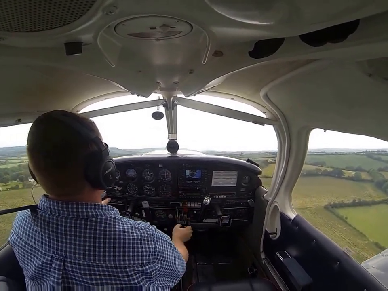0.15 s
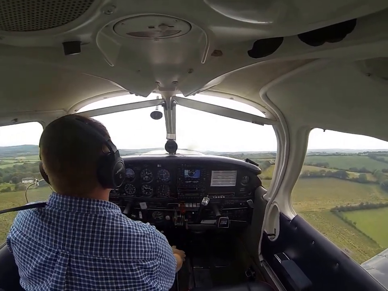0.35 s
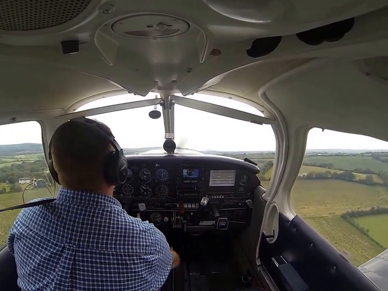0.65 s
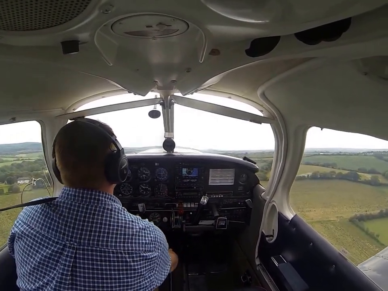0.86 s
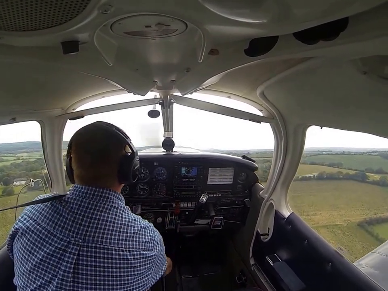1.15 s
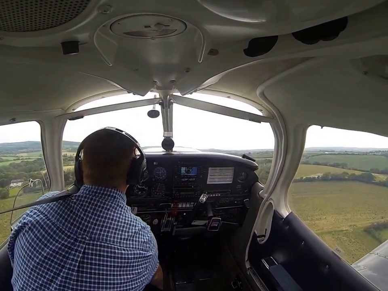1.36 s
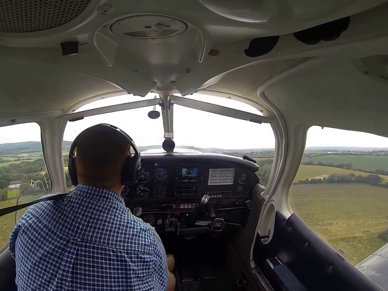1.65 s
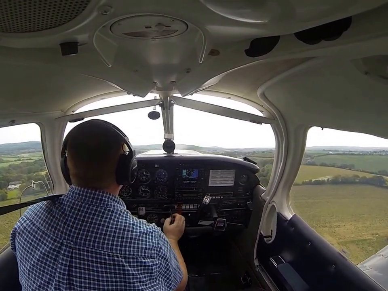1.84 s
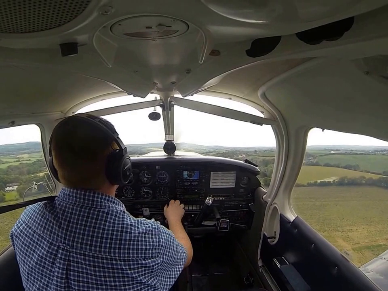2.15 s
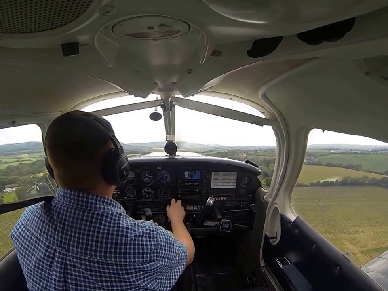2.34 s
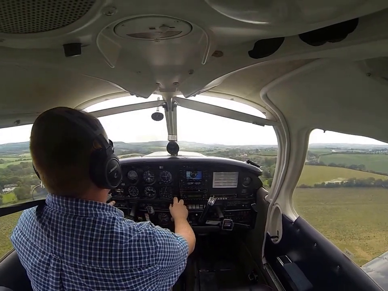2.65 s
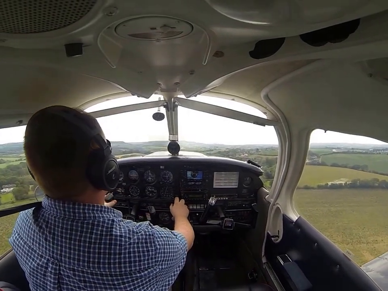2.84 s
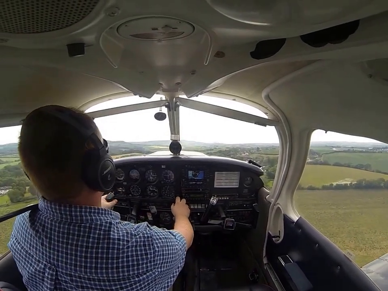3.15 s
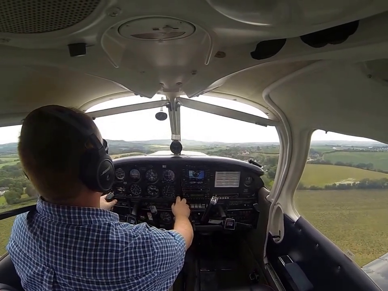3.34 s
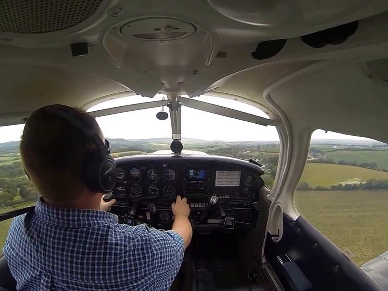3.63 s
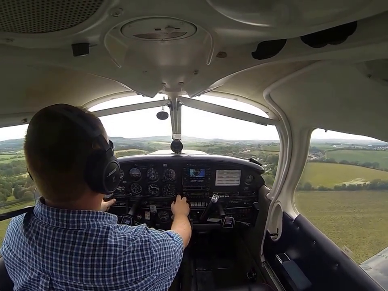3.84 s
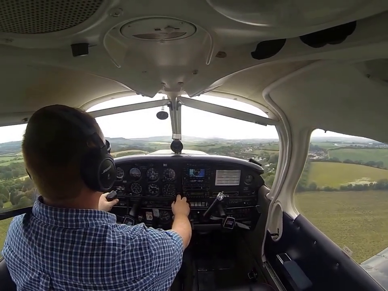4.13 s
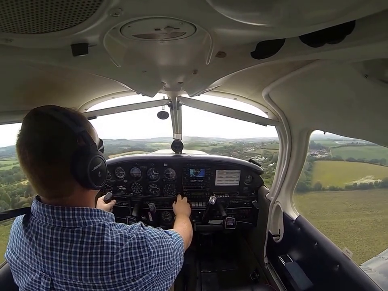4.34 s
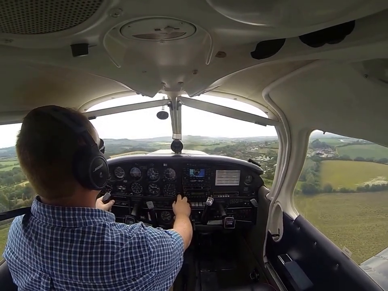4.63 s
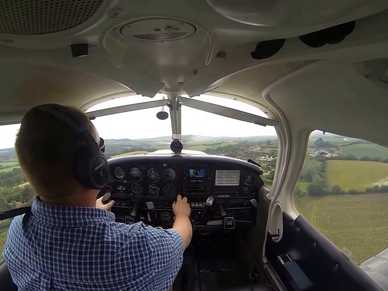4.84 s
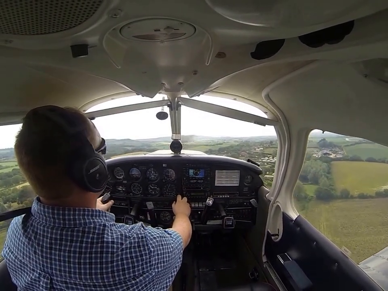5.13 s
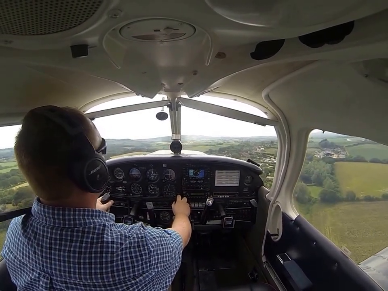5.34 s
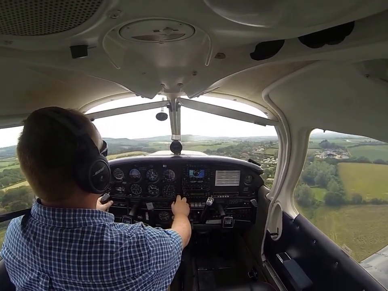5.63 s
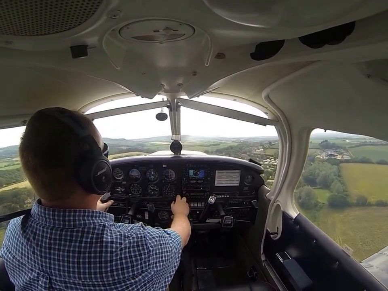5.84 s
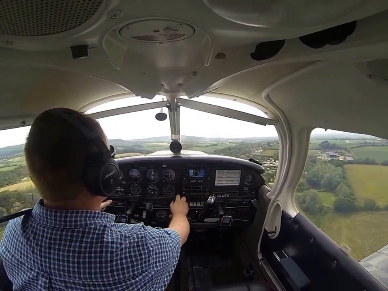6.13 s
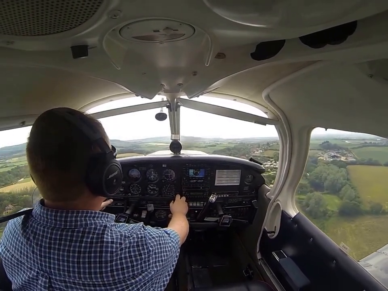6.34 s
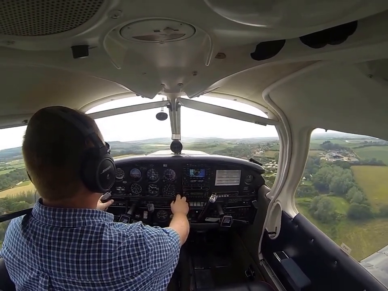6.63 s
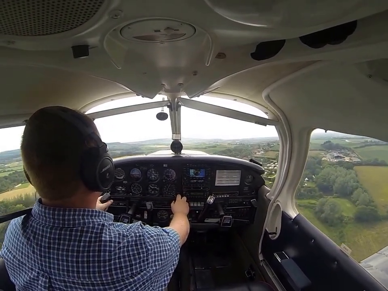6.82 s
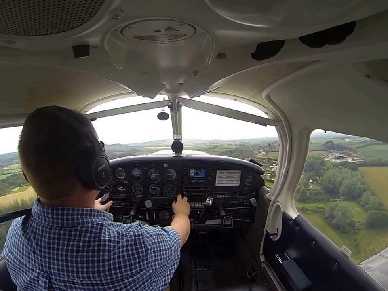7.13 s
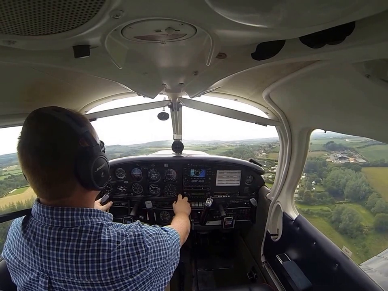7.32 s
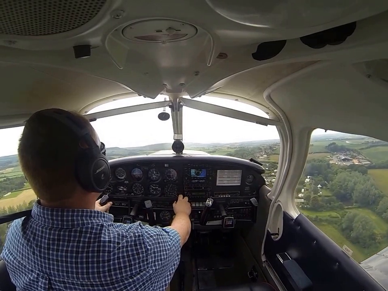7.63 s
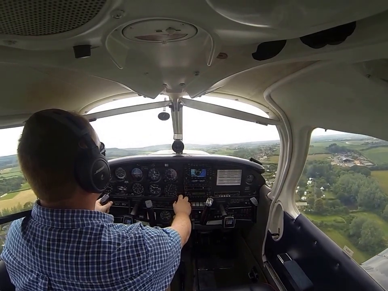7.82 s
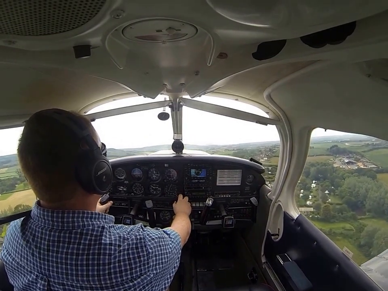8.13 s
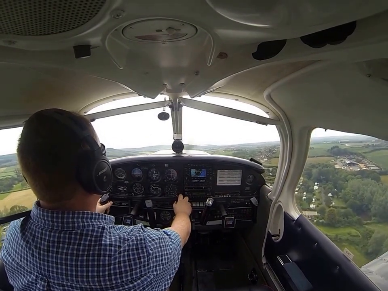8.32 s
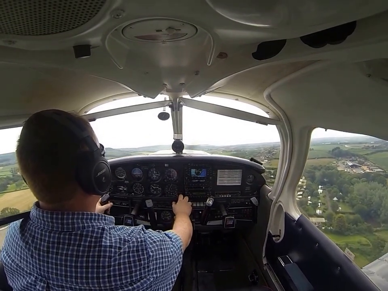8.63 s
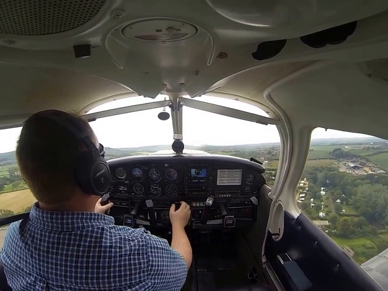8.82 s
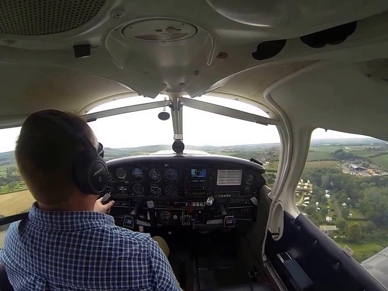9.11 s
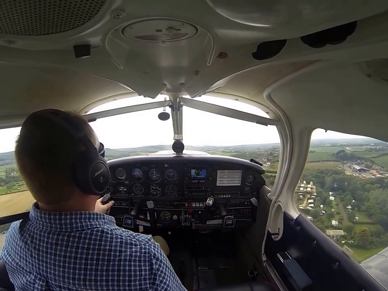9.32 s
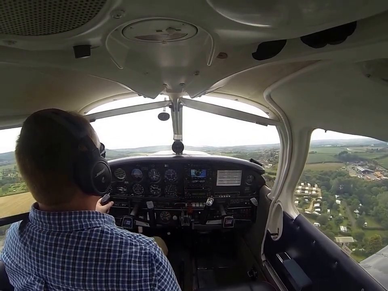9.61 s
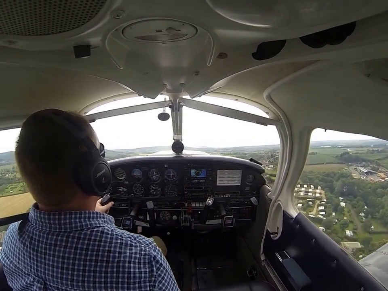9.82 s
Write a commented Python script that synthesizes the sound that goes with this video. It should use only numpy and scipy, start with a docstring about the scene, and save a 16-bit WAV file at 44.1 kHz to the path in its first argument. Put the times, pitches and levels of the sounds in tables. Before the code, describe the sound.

Inside a light aircraft cockpit, a piston engine and propeller drone steadily with deep throbbing boom, panel buzz and soft wind hiss throughout.

```python
"""A four-cylinder engine turning a two-blade propeller near 2570 rpm drones in a light aircraft on climb-out.
Firings and blades boom on multiples of the shaft speed; uneven cylinders shake the cabin panels each cycle.
The slipstream is filtered noise that hisses round the windows, over a low noise rumble of the airframe.
The drone firms up as the speed creeps up; a few noise bursts tick in the cabin and a thin whine pulses."""
import sys
import numpy as np
from scipy import signal
from scipy.fft import rfft, irfft
from scipy.io import wavfile

SR = 44100
rng = np.random.default_rng(int(sys.argv[2]) if len(sys.argv) > 2 else 0)


def wav_out(sig):
    """Save sig, one row per channel (or a flat mono array), as 16-bit PCM at SR to the path in sys.argv[1]."""
    wavfile.write(sys.argv[1], SR, np.round(np.clip(np.atleast_2d(sig).T, -1, 1) * 32767).astype(np.int16))


N = 439677

# low rumble of the airframe, relative levels: (pitch_hz, level_db per Hz)
RUMBLE_SPECTRUM = [(8, -48.5), (15, -14), (23, 4.5), (35, -7.5), (60, -9.5), (78, -2), (110, -10.5),
                   (145, -15), (230, -16), (285, -12.5), (318, -8.5), (355, -16), (420, -30), (1000, -68)]
# slipstream before the gaps colour it, relative levels: (pitch_hz, level_db per Hz)
WIND_SPECTRUM = [(500, -2), (1700, -0.5), (2050, -11), (3200, -3), (4200, -8), (5300, -9), (6100, -14),
                 (7500, -15), (8600, -18), (10000, -22.5), (12000, -30), (14000, -39), (14700, -42)]
# window and door gaps that colour the slipstream: (pitch_hz, width_hz, lift_db)
WINDOW_GAPS = [(2437, 450, 12.5), (2934, 400, 7), (3790, 230, 4.5), (4830, 960, 6), (6570, 300, 6),
               (7060, 450, 8.5), (7870, 580, 7.5)]
# strength of the airflow; only its swing about the mean is used: (time_s, level_db)
AIRFLOW_LEVEL = [(0.1, -56.5), (0.61, -56.5), (1.05, -57), (1.1, -56.5), (1.24, -56), (4.06, -56.5),
                 (4.34, -55), (5.26, -56.5), (5.72, -55.5), (5.91, -52), (6.29, -53), (6.37, -55),
                 (7.89, -53), (8.41, -54.5), (8.68, -53), (9.85, -54.5)]
# small hard ticks in the cabin, levels at the onset: (start_s, snap_db, knock_db, time to fall 60 dB t60_s)
CABIN_TICKS = [(0.944, -56, -50, .06), (1.200, -56, -44, .06), (5.5796, -43, -16, 0.011)]
# what the knock of a tick rings with, relative levels: (pitch_hz, width_hz, level_db)
KNOCK_RESONANCES = [(1460, 240, 6), (2840, 640, -5), (4600, 900, -18)]
# cabin panels shaken by the engine, relative levels: (pitch_hz, width_hz, level_db)
PANEL_RESONANCES = [(520, 240, -13.5), (694, 115, -4), (840, 48, -7), (918.6, 45, -6), (1065, 98, -8),
                    (1303, 160, -12.5), (1442, 136, -3), (1635, 167, -9.5)]
# relative push of each cylinder on the panels, in firing order, the two strong cylinders first: (push_db)
CYLINDER_PUSH = [0.75, 0.79, -.2, -0.68]
# other lines of the drone: (multiple of shaft speed, slow_db at the slow speed, fast_db at the fast speed)
DRONE_LINES = [(1.5, -46, -37), (3.0, -54, -37), (3.5, -46, -47), (4.5, -47, -44), (5.0, -54, -43),
               (5.5, -48, -42), (6.5, -48, -41), (7.0, -36, -34), (7.5, -38, -35), (8.0, -28, -27),
               (8.5, -49, -45), (9.0, -43, -42), (9.5, -50, -48), (10.0, -50, -48), (12, -58, -50),
               (13.0, -48, -44)]
# second harmonic of the blade rate, before a fixed trim: (time_s, level_db)
BLADE_OVERTONE = [(0.1, -31), (0.51, -41), (0.72, -28), (1.21, -41.5), (2.0, -42), (2.05, -30.5),
                  (3.33, -46), (3.38, -33.5), (8.63, -40), (9.3, -32), (9.39, -40), (9.85, -44)]
# boom at the firing and blade rate, before its random throb: (time_s, level_db)
BOOM_LEVEL = [(0.05, -11.5), (0.63, -11.5), (0.92, -13), (2.87, -12.5), (3.53, -14.5), (4.49, -13),
              (4.6, -17), (5.15, -13), (5.45, -18), (5.51, -11.5), (5.76, -19), (6.09, -14), (6.52, -18),
              (6.66, -15.5), (8.94, -13.5), (9.21, -16.5), (9.79, -16.5), (9.9, -15)]
# firings per second, two to each turn of the shaft, before a little hunting: (time_s, rate_hz)
FIRING_RATE = [(0.0, 85.1), (1.97, 85.3), (2.58, 85.5), (4.41, 85.7), (4.66, 85.6), (6.41, 86.4),
               (8.47, 86.6), (8.69, 86.8), (9.97, 86.5)]

KICK_AT = 0.375  # share of the engine cycle (two turns) at which the first of the two strong cylinders fires
SLOW_HZ, FAST_HZ = 85.8, 86.2  # firing rates between which the drone firms up
HISS_DB, HISS_PER_FLOW = -42.5, 0.87  # mean hiss; dB it gains for each dB of airflow
ROAR_DB, ROAR_PER_FLOW = -32, 0.65  # mean panel roar; dB it gains for each dB of airflow
HOWL_DB, HOWL_DB_PER_HZ = -36.3, 4.2  # howl at SLOW_HZ; dB it gains for each Hz of firing rate
TOP_HZ = 14500  # upper edge of the treble
T = np.arange(N) / SR  # time in seconds
HZ = np.maximum(np.arange(N // 2 + 1) * SR / N, 1)  # frequency of every spectrum bin


def undb(db):
    """Turn decibels into gain."""
    return 10 ** (np.asarray(db) / 20)


def unit(x):
    """Scale to an rms (average strength) of one."""
    return x / np.sqrt(np.mean(x ** 2))


def curves(table):
    """Join each column of a table, whose first column is time, by straight lines."""
    s, *columns = np.transpose(table)
    return [np.interp(T, s, column) for column in columns]


def noise():
    """White noise: equal strength at every pitch."""
    return rng.standard_normal(N)


def walk(rate_hz):
    """Smooth random wandering of rms one, moving up to about rate_hz times a second."""
    return unit(irfft(rfft(noise()) / (1 + (HZ / rate_hz) ** 2), N))


def slope(points):
    """Gain at every frequency, joined from (Hz, dB) points."""
    hz, db = np.transpose(points)
    return undb(np.interp(np.log(HZ), np.log(hz), db))


def resonance(hz, width_hz):
    """Gain of a steep resonance (two in a row) at every frequency."""
    detuning = (HZ ** 2 - hz ** 2) / (2 * HZ * width_hz / np.sqrt(2))
    return 1 / (1 + detuning ** 2)


def body(modes):
    """Gain of several resonances whose powers add."""
    powers = [(undb(db) * resonance(hz, width)) ** 2 for hz, width, db in modes]
    return np.sqrt(sum(powers))


def colour(x, gain):
    """Filter x by a gain for every frequency, then scale to an rms of one."""
    return unit(irfft(rfft(x) * gain, N))


def tone(turns, order, scatter_turns=0.21):
    """A line of rms one on a shaft multiple; the cabin scatters its phase from the KICK_AT firing."""
    phase = order * (turns - 2 * KICK_AT) + scatter_turns * rng.standard_normal()
    return np.sqrt(2) * np.cos(2 * np.pi * phase)


def swell(turns, order, rate_hz):
    """A line of about rms one on a shaft multiple that swells, fades and slips at random."""
    drift = walk(rate_hz) + 1j * walk(rate_hz)
    return (drift * np.exp(2j * np.pi * order * turns)).real


def rumble(gust_db, rumble_db=-26, per_flow=0.55, buffet_db=1):
    """Buffeting air and engine vibration rumble through the airframe, more in a stronger flow."""
    level_db = rumble_db + per_flow * gust_db + buffet_db * walk(6.1)
    return undb(level_db) * colour(noise(), slope(RUMBLE_SPECTRUM))


def slipstream(turns, hiss_db, blade_depth=0.031, flicker_db=0.42):
    """Air hisses past the window and door gaps, chopped slightly by the passing blades."""
    lift_db = sum(db * resonance(hz, width) ** 2 for hz, width, db in WINDOW_GAPS)
    chop = 1 + blade_depth * np.cos(2 * np.pi * 2 * turns)
    hiss = colour(chop * noise(), slope(WIND_SPECTRUM) * undb(lift_db))
    return undb(hiss_db + flicker_db * walk(6.9)) * hiss


def whine(hz=12890, rate_hz=48, whine_db=-81):
    """A thin electronic whine: a narrow band of noise in steady pulses."""
    pulse = (1 + np.cos(2 * np.pi * rate_hz * T)) ** 2
    return undb(whine_db) * unit(pulse * colour(noise(), resonance(hz, 60)))


def ticks(snap_hz=11200, snap_width_hz=1900):
    """Short hard contacts: each dying noise burst rings a bright snap over a dull knock."""
    snap, knock = 0, 0
    for start_s, snap_db, knock_db, t60_s in CABIN_TICKS:
        decay = np.exp(-np.log(1000) * np.maximum(T - start_s, 0) / t60_s)
        burst = noise() * (T >= start_s) * decay
        snap = snap + undb(snap_db) * burst
        knock = knock + undb(knock_db) * burst
    snap_spectrum = rfft(snap) * unit(resonance(snap_hz, snap_width_hz))
    knock_spectrum = rfft(knock) * unit(body(KNOCK_RESONANCES))
    return irfft(snap_spectrum + knock_spectrum, N)


def panels(turns, roar_db, repeat=0.38, pulse_depth=0.081):
    """Each firing sends a burst into the panels; part of the clatter repeats every engine cycle."""
    cycle = (turns / 2 - KICK_AT) % 1  # 0 when the first of the two strong cylinders fires
    count = len(CYLINDER_PUSH)
    push = undb(np.interp(cycle, np.arange(count) / count, CYLINDER_PUSH, period=1))
    burst = 1 + pulse_depth * np.cos(2 * np.pi * count * cycle)
    pattern = rng.standard_normal(size=2048)
    clatter = unit(np.interp(cycle, np.arange(len(pattern)) / len(pattern), pattern, period=1))
    # repeat is the share of power in the repeating clatter
    mix = np.sqrt(repeat) * clatter + np.sqrt(1 - repeat) * noise()
    return undb(roar_db) * colour(push * burst * mix, body(PANEL_RESONANCES))


def howl(turns, firing_hz, sharp=4, uneven=0.3, rough=0.4, ring_hz=692, width_hz=50):
    """A panel near 16 times shaft speed rings louder with speed, kicked unevenly once a cycle."""
    between = 0.5  # steady part of the ringing, relative to the kick
    peak = np.exp(sharp * (np.cos(np.pi * turns - 2 * np.pi * KICK_AT) - 1))  # highest at KICK_AT
    kick = between + (1 + uneven * walk(12)) * peak
    ring = tone(turns, order=16) + rough * colour(noise(), resonance(ring_hz, width_hz))
    return undb(HOWL_DB + HOWL_DB_PER_HZ * (firing_hz - SLOW_HZ)) * unit(kick * ring)


def drone(turns, fast, waver=0.27, firm_db=-33, drift_hz=1.7):
    """The other engine and propeller lines; gusts through the disc make the weak ones waver most."""
    out = 0
    for order, slow_db, fast_db in DRONE_LINES:
        db = slow_db + fast * (fast_db - slow_db)
        depth = waver / (1 + undb(db - firm_db) ** 2)
        out = out + undb(db) * (tone(turns, order) + depth * swell(turns, order, drift_hz))
    return out


def blades(turns, fast, second_db=-2, third_db=-45, third_rise_db=11, gust_db=-41, gust_hz=1.6):
    """The blade rate's second harmonic comes and goes; the third wavers in turbulence, firming with speed."""
    overtone_db, = curves(BLADE_OVERTONE)
    second = undb(overtone_db + second_db) * tone(turns, order=4)
    steady = undb(third_db + third_rise_db * fast) * tone(turns, order=6)
    wavering = undb(gust_db) * swell(turns, order=6, rate_hz=gust_hz)
    return second + steady + wavering


def boom(turns, fast, shaft_db=-21, shaft_rise_db=4, shake_db=-19.0, shake_rise_db=2.0,
         throb_db=0.8, wobble_db=1.6, wobble_hz=1.9, sway_turns=0.0043):
    """Two firings and two blades a turn boom; shaft (each turn) and mounts (each two) shake more with speed."""
    boom_db, = curves(BOOM_LEVEL)
    firing_level = undb(boom_db + throb_db * walk(wobble_hz))
    firing = firing_level * np.cos(2 * np.pi * 2 * (turns + sway_turns * walk(1.4)))
    shaft = undb(shaft_db + shaft_rise_db * fast) * np.cos(2 * np.pi * turns)
    rocking_level = undb(shake_db + shake_rise_db * fast + wobble_db * walk(wobble_hz))
    rocking = rocking_level * np.cos(np.pi * (turns + 1 / 4))
    return -np.sqrt(2) * (firing + shaft + rocking)  # all three pull nearly together once a cycle


def scene():
    """The slightly hunting shaft drives every engine line; the airflow sets hiss, rumble and panel roar."""
    hunt_hz = 0.051  # rms wander of the firing rate
    firing_hz, = curves(FIRING_RATE)
    turns = np.cumsum(firing_hz + hunt_hz * walk(6.3)) / 2 / SR  # shaft turns so far
    fast = np.clip((firing_hz - SLOW_HZ) / (FAST_HZ - SLOW_HZ), 0, 1)  # 0 slow, 1 fast
    flow_db, = curves(AIRFLOW_LEVEL)
    gust_db = flow_db - flow_db.mean()
    air = rumble(gust_db) + slipstream(turns, HISS_DB + HISS_PER_FLOW * gust_db)
    roar = panels(turns, ROAR_DB + ROAR_PER_FLOW * gust_db)
    lines = howl(turns, firing_hz) + drone(turns, fast) + blades(turns, fast) + boom(turns, fast)
    return (air + whine() + ticks() + roar + lines)[None]


def record(dry):
    """The sound fades in over 4 ms, and a steep low-pass filter cuts the top of the treble."""
    ease = np.sin(np.pi / 2 * np.minimum(T / 0.004, 1)) ** 2
    low_pass = signal.ellip(10, 0.2, 80, TOP_HZ, fs=SR, output="sos")  # 0.2 dB ripple, 80 dB cut
    return signal.sosfilt(low_pass, ease * dry)


dry = scene()
out = record(dry)
wav_out(out)
```